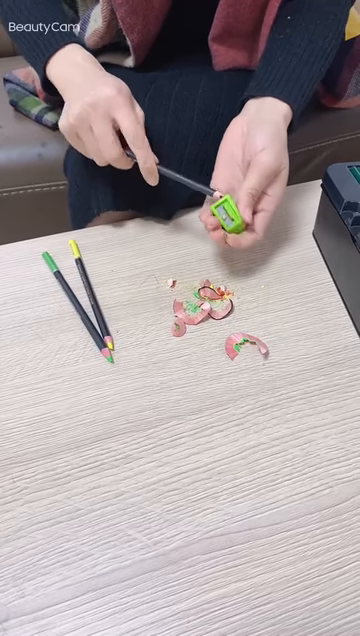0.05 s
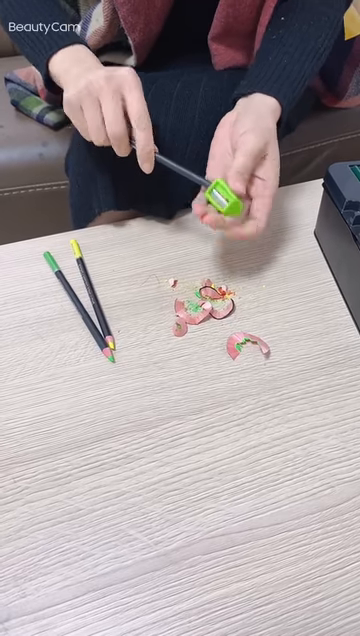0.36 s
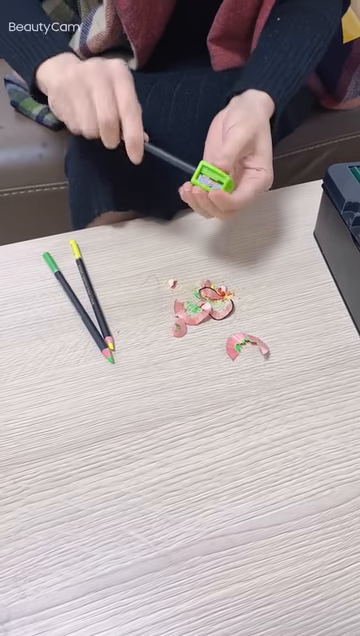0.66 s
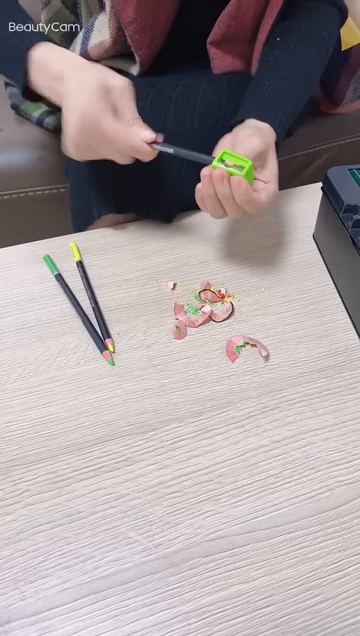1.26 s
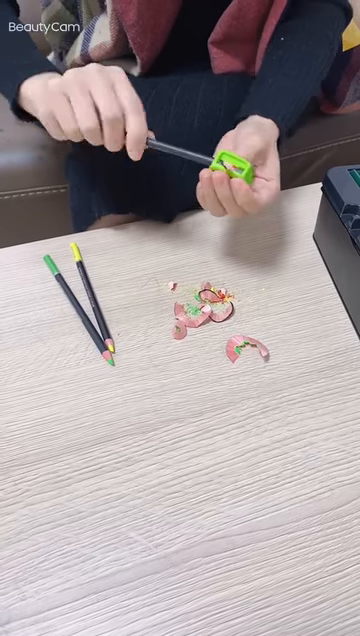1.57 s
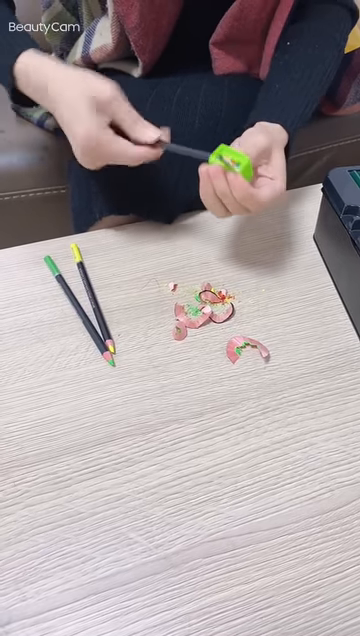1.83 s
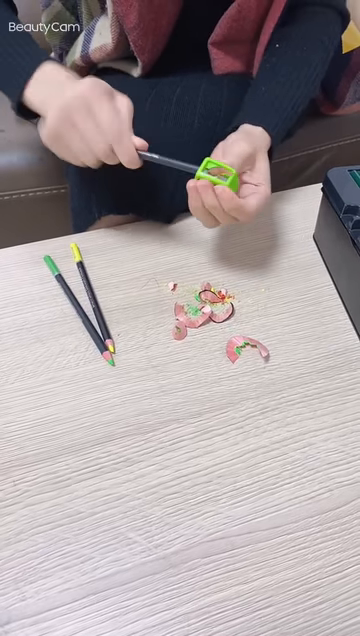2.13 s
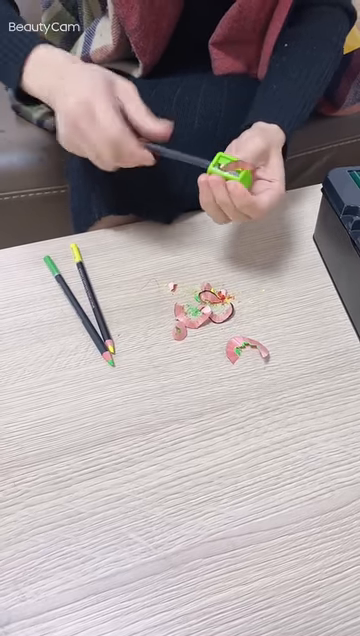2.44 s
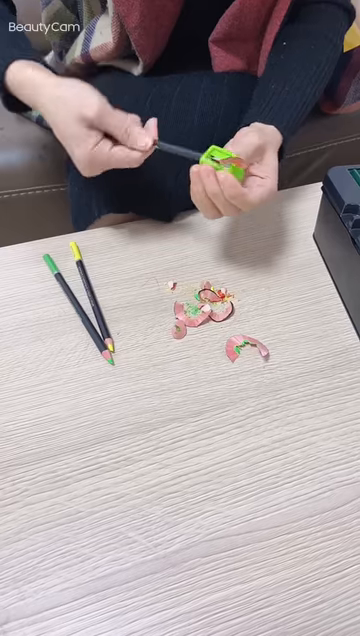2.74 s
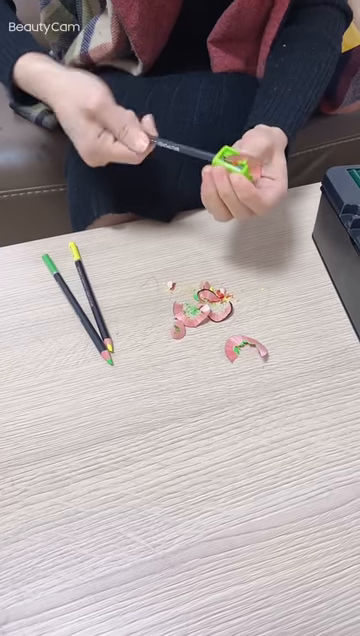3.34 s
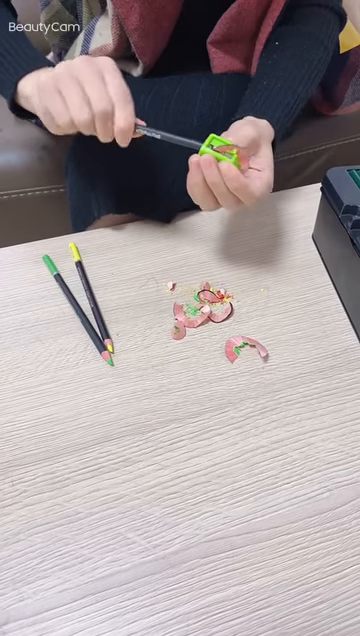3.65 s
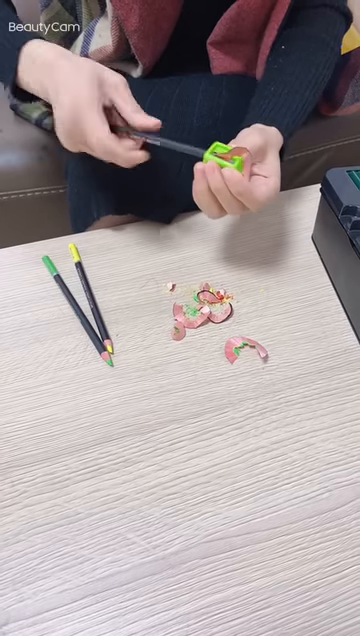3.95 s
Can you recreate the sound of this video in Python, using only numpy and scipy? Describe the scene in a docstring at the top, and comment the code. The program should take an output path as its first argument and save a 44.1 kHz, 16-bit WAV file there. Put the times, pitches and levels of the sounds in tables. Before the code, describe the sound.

A small hand sharpener shaves a pencil in a quiet, faintly humming room. After a light plastic tick, seven crisp scraping twists follow evenly, with crackling wood and soft rubbing between turns, and a slight echo.

```python
"""A small hand sharpener cuts a coloured pencil in seven twists, over a table in a quiet room.
In each twist the wood sticks and slips on the blade, which rings near 7.5 kHz, and a shaving
tears off in tiny cracks. Chips snap, and the pencil rubs, squeaks and knocks in the sharpener.
The table and the room echo these sounds, over a low rush of air and the hum of an appliance."""
import sys
import numpy as np
from scipy import signal
from scipy.fft import rfft, irfft, next_fast_len
from scipy.io import wavfile
from scipy.ndimage import map_coordinates

SR = 44100
rng = np.random.default_rng(int(sys.argv[2]) if len(sys.argv) > 2 else 0)


def file_out(sig):
    """Save sig as 16-bit WAV at sys.argv[1]."""
    # one column per channel
    cols = np.atleast_2d(sig).T
    # limit, then scale
    lim = np.clip(cols, -1, 1)
    pcm = np.round(lim * 32767).astype(np.int16)
    wavfile.write(sys.argv[1], SR, pcm)


N = 176400  # 4 seconds
TWIST_ATTACK_S, RUB_ATTACK_S = 0.011, 0.0027  # how long a sound takes to fade in

# How strongly the blade rings at each pitch: pitch_hz, gain_db
BLADE_TONE = [(500, -38), (1800, -34), (3300, -33), (5000, -34), (5900, -19), (6600, -10), (7150, -4),
              (7600, -1), (8300, -8.5), (8900, -26), (12000, -26), (14500, -31.5)]
# When the wood chatters on the blade: start_s, length_s, level_db, level_change_db
CHATTERS = [(0.668, .063, -40, 3), (.748, 0.025, -41, -2), (1.195, 0.075, -42, -3),
            (1.646, 0.098, -40, -1.5), (2.082, 0.016, -39, 0), (2.118, 0.11, -47.5, 4),
            (2.623, 0.07, -41, 1), (3.187, 0.079, -38.5, -8.5), (3.703, 0.085, -44.5, 3.5)]
def blade_chatter():
    """The wood sticks and slips in uneven clumps, which makes the blade ring."""
    force = 0
    for start_s, length_s, level_db, change_db in CHATTERS:
        progress = np.clip((clock() - start_s) / length_s, 0, 1)
        fade = envelope(start_s, length_s, TWIST_ATTACK_S, fall_db_per_s=485)
        force += gain(level_db + change_db * progress) * fade
    slips = cracks(per_second=3000, spread_db=2.0, hiss=0.43)
    clumps = gain(3.2 * wobble(260))
    return colour(force * normalise(slips * clumps), BLADE_TONE)


# How strong tearing wood is at each pitch: pitch_hz, gain_db
WOOD_TONE = [(400, -28.5), (1200, -21), (1650, -18), (2250, -11), (2700, -14), (3600, -13.5), (4300, -12),
             (5200, -10), (6100, 1.5), (7800, 4.5), (8900, 1.5), (10500, -6.5), (12300, -2.5),
             (13200, -15.5), (14300, -14)]
# Cuts, each deepest at a share (0 to 1) of its length:
# start_s, length_s, peak_db, deepest_share, rise_db, shaft_pitch_hz, shaft_gain_db
CUTS = [(0.728, 0.053, -37, 0.78, 13, 1700, -30), (1.189, 0.096, -41, 0.71, 12.5, 1760, -17.5),
        (1.646, 0.088, -39.5, 0.54, 5, 1960, -18.5), (2.078, 0.029, -40, 0.87, 5, 2330, -21.5),
        (2.131, 0.11, -43, 0.8, 12.5, 2000, -19), (2.622, 0.084, -42, 0.22, 4, 1970, -18.5),
        (3.164, 0.11, -38.5, 0.32, 3.5, 2080, -25), (3.676, 0.1, -39.5, 0.73, 7, 2170, -18.5)]
def shaving():
    """Each cut deepens and eases; the tearing fibres also make the pencil's shaft ring."""
    fibres = cracks(per_second=2000, spread_db=3.5, hiss=0.53)
    tearing = shaft = 0
    for start_s, length_s, peak_db, deepest, rise_db, shaft_hz, shaft_db in CUTS:
        progress = (clock() - start_s) / length_s
        arch_db = np.interp(progress, [0, deepest, 1], [-rise_db, 0, -6 * (1 - deepest)])
        fade = envelope(start_s, length_s, TWIST_ATTACK_S, fall_db_per_s=265)
        cut = fibres * gain(peak_db + arch_db) * fade
        tearing += cut
        shaft += gain(shaft_db) * ring(cut, shaft_hz, sharpness=6)
    return curling(colour(tearing, WOOD_TONE)) + shaft


def curling(sound, depth_db=4, width_hz=443.6, life_s=0.045, size=512):
    """The growing shaving curls, so the pitches it rings at come and go."""
    spectrum = signal.stft(sound, nperseg=size)[2]
    times_s = np.arange(spectrum.shape[1]) * size / 2 / SR
    hz, t = np.meshgrid(np.fft.rfftfreq(size, 1 / SR), times_s, indexing="ij")
    noise = rng.standard_normal(spectrum.shape)
    patches = map_coordinates(noise, [hz / width_hz, t / life_s], mode="mirror")
    return signal.istft(spectrum * normalise(gain(depth_db * patches)), nperseg=size)[1][:N]


# Light rubs of the pencil in the sharpener's cone: start_s, length_s, strength_db
RUBS = [(0.243, 0.034, -63.5), (0.379, 0.082, -58), (0.635, 0.033, -46.5), (1.002, 0.14, -60.5),
        (1.132, 0.045, -60), (1.171, 0.018, -45.5), (1.343, 0.11, -58), (1.516, 0.14, -58.5),
        (1.62, .022, -43), (1.816, .06, -61.5), (1.952, 0.018, -56), (2.033, 0.055, -54),
        (2.342, 0.031, -59), (2.463, 0.125, -60.5), (2.592, 0.029, -43), (2.767, 0.057, -60.5),
        (2.966, .085, -57.5), (3.099, 0.02, -57.5), (3.32, 0.11, -60), (3.505, 0.078, -58),
        (3.647, 0.01, -45.5), (3.89, 0.03, -65)]
# The blade catches and a chip snaps off: start_s, strength_db
SNAPS = [(.606, -58), (.645, -37.5), (.657, -34), (.676, -34), (.762, -33), (.773, -31), (.777, -33),
         (1.016, -48), (1.133, -51), (1.171, -37), (1.269, -25), (1.628, -42), (1.649, -29), (1.748, -32),
         (1.958, -46), (2.077, -39), (2.1, -29), (2.229, -28), (2.597, -38), (2.683, -34), (3.151, -26.5),
         (3.154, -22.5), (3.163, -33), (3.177, -44), (3.208, -30), (3.653, -49), (3.677, -27.5),
         (3.681, -26), (3.686, -31), (3.826, -50)]
def rubs_and_snaps():
    """The pencil rubs as the fingers grip anew, and chips snap; both ring the blade and the wood."""
    force = gain(-71.5 + 2.9 * wobble(9.8))  # the pencil never lies quite still
    for start_s, length_s, strength_db in RUBS:
        swell_db = -9 * np.clip(1 - (clock() - start_s) / length_s, 0, 1)
        fade = envelope(start_s, length_s, RUB_ATTACK_S, fall_db_per_s=374)
        force += gain(strength_db + swell_db) * fade
    sound = 0
    for tone, gain_db in [(BLADE_TONE, -6.5), (WOOD_TONE, -7.5)]:
        rubbing = force * cracks(per_second=1100, spread_db=3.5, hiss=0.66)
        snapping = bursts(SNAPS, fade_s=0.013)
        sound += gain(gain_db) * colour(rubbing + snapping, tone)
    return sound


# How strongly the plastic case rings at each pitch: pitch_hz, gain_db
CASE_TONE = [(300, -27), (1000, -11), (1600, 5), (3000, -7), (4500, -8), (6500, 1), (8000, 0), (10000, -14),
             (14000, -25)]
# Knocks on the case: start_s, level_db
KNOCKS = [(.148, -42), (.271, -50), (1.314, -48), (3.738, -47), (3.826, -44.5)]
def case_knocks():
    """The pencil bumps the sharpener's plastic case, which rings briefly."""
    return colour(bursts(KNOCKS, fade_s=0.011), CASE_TONE)


# Faint, dry squeaks: start_s, length_s, pitch_hz, level_db
SQUEAKS = [(1.955, 0.0053, 6150, -56), (3.402, 0.013, 6170, -54)]
def squeaks():
    """The pencil slips as it is gripped anew, and each slip rings at one pitch."""
    sound = 0
    for start_s, length_s, pitch_hz, level_db in SQUEAKS:
        slip = rng.standard_normal(N) * envelope(start_s, length_s, RUB_ATTACK_S, fall_db_per_s=1500)
        sound += gain(level_db) * ring(slip, pitch_hz, sharpness=24)
    return sound


# How long the room's echo takes to fade by 60 dB: pitch_hz, fade_s
ECHO_FADES = [(300, 0.41), (3000, 0.66), (8000, 0.44), (14000, 0.26)]
def room_echo(sound, bounces=8, bounce_db=-6.5, tail_db=-10, build_s=0.012):
    """Sound bounces off the table and hands, then dies away in the room."""
    hz, t, noise = signal.stft(rng.standard_normal(SR // 2), SR, nperseg=256)
    fade = gain(-60 * t / value_at(ECHO_FADES, hz)[:, None])
    tail = signal.istft(noise * fade * np.clip(t / build_s, 0, 1), SR, nperseg=256)[1]
    echo = gain(tail_db) * tail / np.linalg.norm(tail)
    delays_s = rng.uniform(0.001, 0.012, bounces)
    signs = rng.choice([-1, 1], bounces)
    echo[(delays_s * SR).astype(int)] += gain(bounce_db) * signs / np.sqrt(bounces)
    return signal.fftconvolve(sound, echo)


def changing_echo(sound, size=8192):
    """The hands move, so each short piece of the sound gets a different echo."""
    echoes = np.zeros(N + SR)
    for start in range(0, N - size, size // 2):
        echo = room_echo(sound[start:start + size] * np.hanning(size))
        echoes[start:start + len(echo)] += echo
    return echoes[:N]


# The tones in the hum: pitch_hz, level_db
HUM_TONES = [(58.66, -55), (65.6, -55), (49.7, -60.5), (97, -59.5), (102.2, -63), (117, -63),
             (167.3, -64.5), (175.7, -63), (626, -76.5)]
def appliance_hum():
    """An appliance hums in wavering tones; those close in pitch throb together."""
    hum = 0
    for pitch_hz, level_db in HUM_TONES:
        phase = 2 * np.pi * (pitch_hz * clock() + rng.random())
        waver = 0.25 * np.sqrt(pitch_hz / HUM_TONES[0][0]) * wobble(4.12)
        hum += gain(level_db) * np.sqrt(2) * np.sin(phase + waver)
    return hum


# How strong the air noise is at each pitch: pitch_hz, gain_db
AIR_TONE = [(20, -27), (38, -9), (48, -4.5), (100, 0), (180, -4), (240, -9), (340, -12.5), (450, -20.5),
            (800, -20.5), (1400, -20.5), (2200, -29.5), (2800, -34.5), (5000, -37), (12000, -45),
            (14000, -59)]
def room_air(level_db=-53.5):
    """The air in the room makes a low, steady rush."""
    return gain(level_db) * normalise(colour(rng.standard_normal(N), AIR_TONE))


def cracks(per_second, spread_db, hiss):
    """Tiny breaks of random size at random moments, over the hiss of rubbing."""
    happens = rng.random(N) < per_second / SR
    sizes = gain(spread_db * np.clip(rng.standard_normal(N), -2, 2))
    clicks = happens * sizes * np.sign(rng.standard_normal(N))
    return normalise(normalise(clicks) + hiss * rng.standard_normal(N))


def bursts(rows, fade_s):
    """Short bursts of noise, each falling 60 dB in fade_s."""
    t = clock()
    power = sum((t >= start_s) * gain(level_db - 60 * np.abs(t - start_s) / fade_s) ** 2
                for start_s, level_db in rows)
    return rng.standard_normal(N) * np.sqrt(power)


def envelope(start_s, length_s, attack_s, fall_db_per_s):
    """A loudness curve that fades in, holds, then fades out."""
    t = clock() - start_s
    return np.clip(t / attack_s, 0, 1) * gain(-fall_db_per_s * np.clip(t - length_s, 0, 1))


def colour(sound, tone, size=16384):
    """Make some pitches stronger and others weaker, following a tone table."""
    cepstrum = irfft(np.log(gain(value_at(tone, np.fft.rfftfreq(size, 1 / SR)))))
    # keep the first half only, so the ringing comes after each hit, never before
    cepstrum[1:size // 2] *= 2
    cepstrum[size // 2 + 1:] = 0
    ringing = irfft(np.exp(rfft(cepstrum)))
    return signal.fftconvolve(sound, ringing / np.linalg.norm(ringing))[:N]


def ring(sound, pitch_hz, sharpness):
    """Make a sound ring at one pitch; a sharper ring lasts longer."""
    ringing = signal.lfilter(*signal.iirpeak(pitch_hz, sharpness, SR), sound)
    return ringing * np.sqrt(SR * sharpness / (np.pi * pitch_hz))


def wobble(per_second):
    """A smooth curve through this many random values a second."""
    values = rng.standard_normal(int(N * per_second / SR) + 4)
    return map_coordinates(values, [clock() * per_second])


def value_at(table, hz):
    """Read a table at any pitch, blending between its rows."""
    pitches_hz, values = np.transpose(table)
    return np.interp(np.log(hz + 1), np.log(pitches_hz + 1), values)


def gain(db):
    """Turn decibels into a number to multiply by."""
    return 10 ** (np.maximum(db, -300) / 20)


def normalise(sound):
    """Scale a sound to an average strength (rms) of 1."""
    return sound / np.sqrt(np.mean(sound ** 2) + 1e-20)


def clock():
    """The time of each sample in seconds."""
    return np.arange(N) / SR


def scene():
    """The sharpener and its echo in the humming room, as one channel."""
    sharpener = blade_chatter() + shaving() + rubs_and_snaps() + squeaks() + case_knocks()
    return (sharpener + changing_echo(sharpener) + appliance_hum() + room_air())[None]


def record(dry):
    """Remove the very highest treble."""
    top_hz = 14300
    size = next_fast_len(N + SR // 2)
    below_top = np.fft.rfftfreq(size, 1 / SR) < top_hz
    return irfft(rfft(dry, size) * below_top, size)[..., :N]


dry = scene()
out = record(dry)
file_out(out)
```